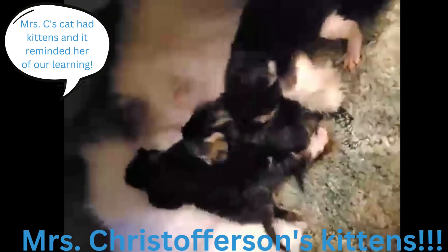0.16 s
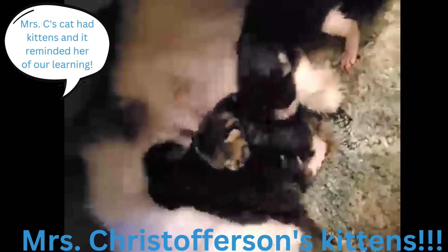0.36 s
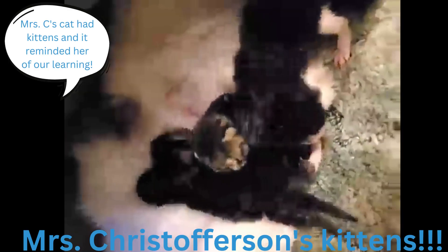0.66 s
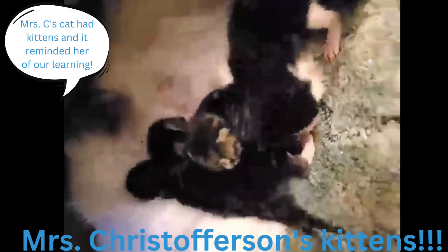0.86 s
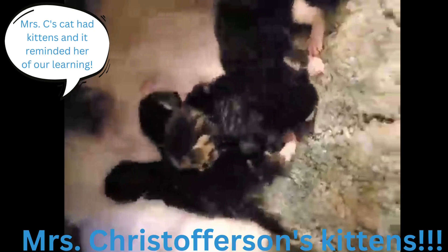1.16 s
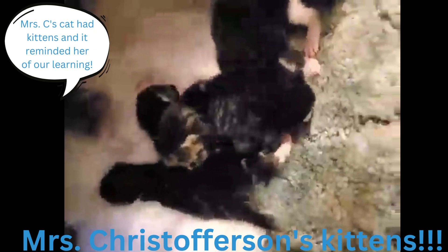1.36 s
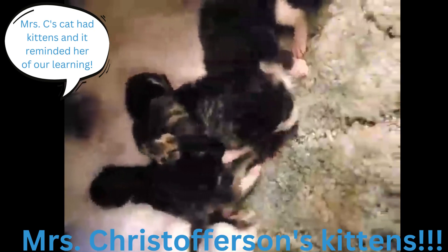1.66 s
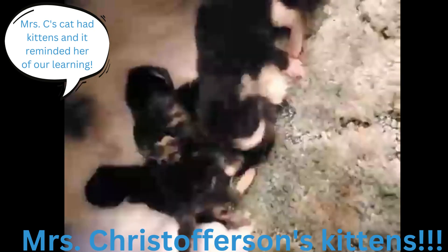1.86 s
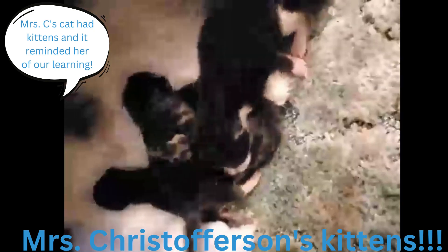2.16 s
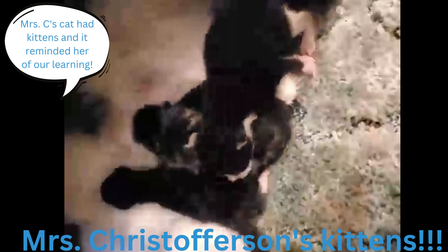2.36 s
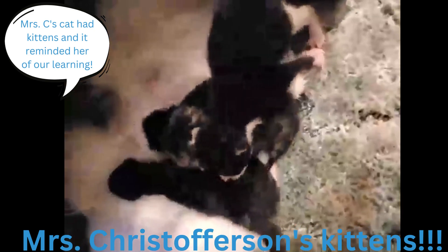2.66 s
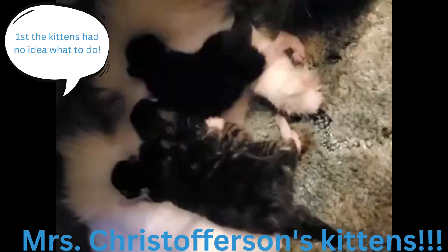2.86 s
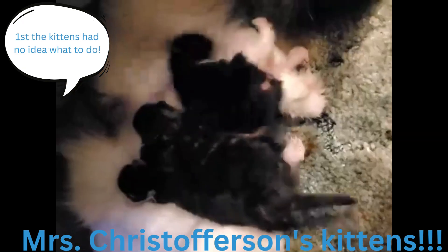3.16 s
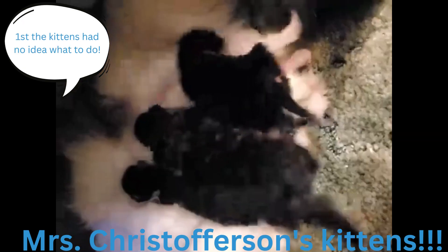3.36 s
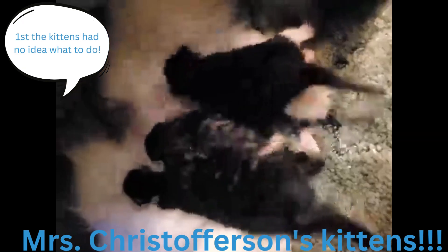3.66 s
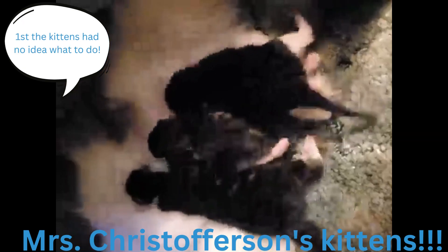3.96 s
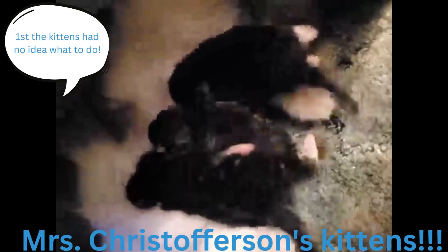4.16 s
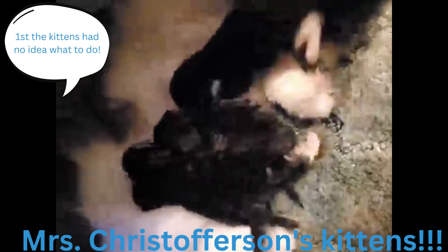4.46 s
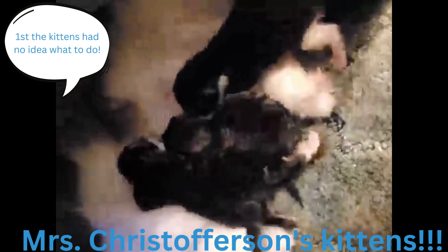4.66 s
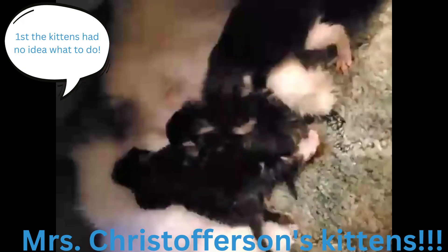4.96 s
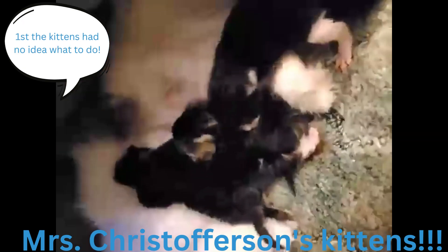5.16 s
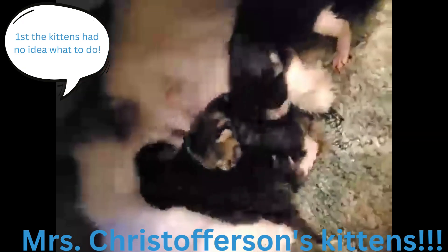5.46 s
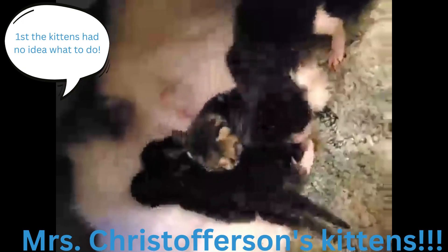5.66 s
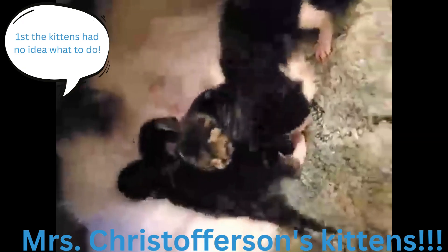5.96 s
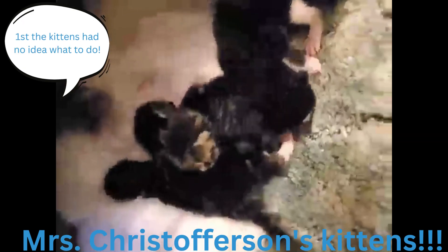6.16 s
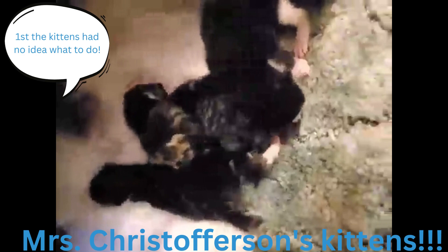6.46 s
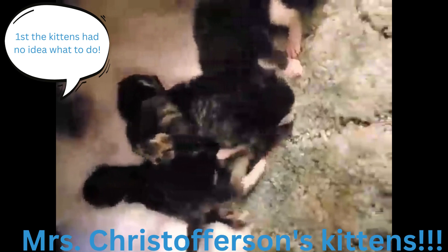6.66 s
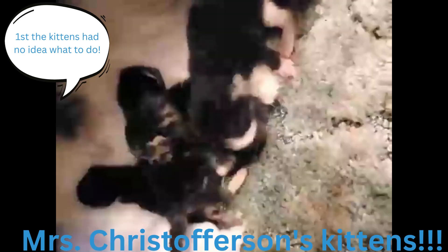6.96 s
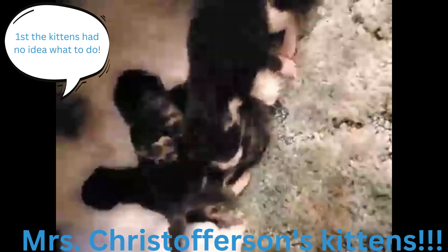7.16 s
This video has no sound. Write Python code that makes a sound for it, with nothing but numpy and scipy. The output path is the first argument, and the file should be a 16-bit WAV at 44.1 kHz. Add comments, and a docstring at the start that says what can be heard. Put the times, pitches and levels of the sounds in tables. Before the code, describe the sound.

A small cat close by gives five short, trilled mews while its ticking, uneven purr runs throughout, with tiny wet smacks in a quiet room.

```python
"""Mewing and purring on a rug

One cat, close by: five mews, trilled in varying degree by its own purr, which runs throughout.
Mew: harmonics of the vocal folds pass nose, throat and mouth resonances; an opening mouth brightens them.
Purr: the larynx snaps shut about 30 times a second; closures tick, reopenings puff, hiss and hum.
Wet smacks, a few stronger ticks, faint rustles, a soft room echo and quiet air with a low rumble lie around."""
import sys
import numpy as np
from scipy import signal
from scipy.fft import rfft, irfft
from scipy.io import wavfile
from scipy.ndimage import uniform_filter1d

SR = 44100
rng = np.random.default_rng(int(sys.argv[2]) if len(sys.argv) > 2 else 0)


def write(x):
    x = np.atleast_2d(x).T
    wavfile.write(sys.argv[1], SR, np.round(np.clip(x, -1, 1) * 32767).astype(np.int16))


N = 322371
T = np.arange(N) / SR  # t/s

# timbre of each mew, pairs from slack to tense folds, settings before opening and closing act: (mouth f/Hz,
# climb/(octaves/s), mouth width/Hz, nose level/dB slack, tense, upper level/dB slack, tense, top over upper level/dB,
# trill [0-1] slack, tense, roughness [0-1] slack, tense, upper f/Hz, top f/Hz, final rattle t/s,
# throat loss/dB at a wide open mouth)
MEW_TIMBRES = [(1680, 1.55, 660, -3.5, -1, -26.5, -6.5, -4.5, .28, 0.01, .3, 0.12, 3230, 5200, 0.093, 1),
               (2430, 0.82, 960, -4, -12.5, -16, -4, -9.5, .38, 0.04, .22, 0.03, 4030, 4940, .125, 10),
               (1900, 0.042, 1230, 4, -7, -20.5, -19.5, 12.5, .58, .45, 0.38, 0.17, 3630, 5820, 0.057, 2),
               (1240, 2.72, 980, 3, -1, -15, -18.5, -1.5, .5, .05, 0.24, 0.08, 3840, 5650, 0.094, 33),
               (1290, 1.74, 1260, 3, -11, -12, -6, -5, .56, 0.4, 0.56, 0.24, 4750, 5660, 0.19, 1)]
# path of each mew, before purr and resonances act: (t/s, pitch f/Hz, level/dB, mouth opening [0-1])
MEW_GESTURES = [
    [(.24, 412.3, -36.5, 0.21), (.31, 460.7, -43.5, 0.53), (.425, 511, -45, 0.52), (.45, 529, -39, 0.88),
     (.495, 545, -32, 0.78), (.54, 560, -35, 0.73), (.59, 577, -39.5, 0.53), (.7, 585, -39.5, 0.44),
     (.74, 547, -43, 0.7), (.785, 494, -44.5, 0.45), (.84, 459, -55, 0.2)],
    [(1.8, 410.3, -41.5, 0.04), (1.89, 410, -37, 0.4), (1.95, 462.4, -33.5, 0.5), (1.99, 523, -39.5, 0.4),
     (2.022, 545, -41, 0.91), (2.06, 559.6, -32, 0.59), (2.1, 560, -32, 0.63), (2.16, 564.6, -37.5, 0.69),
     (2.22, 559, -35.5, 0.61), (2.255, 541.7, -34.5, 0.34), (2.3, 522, -38.5, 0.55),
     (2.335, 447, -36, 0.36), (2.38, 450, -45, .4)],
    [(2.685, 518, -48, 0), (2.712, 481, -32.5, 0.35), (2.745, 478.7, -34, 0.6), (2.81, 521.2, -36, 0.58),
     (2.89, 529.5, -36.5, 0.46), (2.96, 485.7, -38.5, 0.4), (3.02, 415, -42, 0.36),
     (3.08, 401, -40.5, 0.16), (3.145, 353.4, -46, 0), (3.225, 440.6, -36.5, 0.09),
     (3.295, 409, -38.5, 0.19), (3.345, 430.4, -62, 0.35)],
    [(3.742, 467.4, -39.5, 0.54), (3.83, 439, -36, 0.49), (3.9, 429, -40, 0.45), (3.98, 458.5, -35.5, 0.41),
     (4.015, 526.3, -39.5, 0.75), (4.065, 561.4, -41.5, 0.81), (4.12, 561.8, -35.5, 0.63),
     (4.16, 551, -38, 0.61), (4.195, 521.6, -35, 0.35), (4.23, 460.4, -38, .42), (4.275, 444, -64, 0)],
    [(5.465, 423.5, -53.5, 0.47), (5.53, 424.6, -39, 0.14), (5.59, 391, -47, .12), (5.64, 415.4, -35, 0.05),
     (5.74, 440, -37, 0), (5.84, 466, -35.5, 0.27), (5.89, 468, -36.5, 0.66), (5.95, 524, -40.5, 0.72),
     (5.997, 531, -42.5, 0.62), (6.05, 534, -43.5, 0.38), (6.095, 498.4, -44, 0.24),
     (6.16, 500.5, -50, 0.35)],
]
# fixed colour of the voice: (f/Hz, level/dB)
VOICE_COLOUR = [(350, 0.5), (470, 0.4), (590, 1.9), (800, 5.5), (1300, -1.4), (1750, 2.6), (2200, 1.3),
                (2800, 6.9), (3350, 1.2), (3950, 4.1), (4500, -3.7), (5100, -1.3), (8000, -0.8),
                (12000, -13.9)]
# pace of the purring larynx, set anew at each row: (first closure t/s, closure rate f/Hz)
LARYNX_RHYTHM = [(.01, 27), (.855, 25.3), (1.327, 21.5), (1.81, 29), (2.686, 29.4), (3.112, 30.8),
                 (3.426, 28), (3.752, 34.6), (4.38, 35), (4.762, 28.5), (5.49, 31.2), (6.361, 29.6),
                 (6.8502, 26.35)]
# purring strokes, in and out; tick level before easing and fading:
# (start t/s, end t/s, tick level/dB, hum level/dB, hum f/Hz, hiss level/dB)
PURR_STROKES = [(-.05, 0.233, -38.5, -59.5, 287, -57), (0.246, 0.875, -37, -60, 376, -54.5),
                (0.842, 1.102, -49, -67, 252.5, -62.5), (1.079, 1.716, -34.5, -72.5, 243.7, -93),
                (1.789, 2.482, -35.5, -56.5, 370, -53), (2.686, 3.33, -29.5, -50, 345, -52),
                (3.408, 3.78, -39, -62, 263.5, -67), (3.735, 4.296, -31, -60.5, 380, -51),
                (4.334, 4.691, -37.5, -45.5, 297.7, -54), (4.749, 5.502, -36, -58, 271.4, -65),
                (5.474, 6.181, -26, -59, 355, -56), (6.143, 6.29, -38.5, -55, 297, -60),
                (6.324, 6.769, -47, -43, 363.4, -52), (6.841, 7.403, -24.5, -52, 357.5, -90)]
# spectra of the purr's hum, hiss, tick and thin indrawn air: (f/Hz, relative level/dB)
HUM_COLOUR = [(100, -15.5), (240, -4.5), (340, 1.5), (440, -0.5), (590, -36.5), (790, -7), (1020, -17.5),
              (1300, -23), (1800, -55), (3000, -28), (6000, -100)]
HISS_COLOUR = [(500, 15.5), (1300, 9), (1850, 2.5), (3000, 8.5), (3500, -1.5), (4200, 8), (5000, 0),
               (6000, 5.5), (7100, 6.5), (7900, -0.5), (9000, 2.5), (10300, -10), (12500, -6.5),
               (15500, -11)]
TICK_COLOUR = [(80, 7), (350, 11.5), (600, -7), (850, 5), (1300, 6), (1800, -15), (3200, -6.5), (4100, -3),
               (5100, -10), (7000, -5), (15000, -28.5)]
INDRAW_COLOUR = [(500, -9.5), (1300, 0.5), (2500, -17), (4200, -15), (5200, 8), (7200, 3.5), (10000, -8),
                 (12000, -0.5), (15500, -9.5)]
# wet smacks of lips and tongue, and a few stronger purr ticks: (t/s, starting level/dB, resonance f/Hz)
SMACKS_AND_TICKS = [(0.395, -28, 2040), (0.408, -30, 2160), (0.435, -22.5, 2400), (.436, -26, 5350),
                    (.781, -27, 2230), (0.809, -33, 2180), (.818, -36, 2060), (1.326, -44, 1240),
                    (1.877, -22.5, 1840), (2.709, -33, 2620), (2.754, -19.5, 2680), (3.98, -15, 1554),
                    (3.978, -23.5, 3120), (4.394, -32.5, 1193), (4.761, -35, 1170), (4.832, -41, 1150),
                    (5.798, -36.5, 4060)]
# faint squeaks, rustles and soft bumps around the cat: (centre t/s, half-length t/s, f/Hz, width/Hz, level/dB)
RUSTLES = [(0.618, 0.035, 85, 50, -49.5), (1.01, 0.0091, 11450, 700, -56.5),
           (1.048, 0.0073, 11600, 713, -54.5), (4.636, 0.031, 130, 129, -46.5),
           (5.172, 0.042, 3430, 1387, -57), (5.578, 0.0097, 3710, 406, -44),
           (5.608, 0.0086, 3900, 497, -42), (6.088, 0.027, 1547, 154, -33),
           (6.896, 0.014, 106.7, 80.4, -42.5)]
# spectra of the room's air and of its rumble: (f/Hz, relative level/dB)
ROOM_COLOUR = [(18, -64), (30, -14), (90, -3.5), (192, 7.5), (379, -8), (575, -1), (1140, -12.5),
               (1820, -12), (3070, -12.5), (5040, -19.5), (7080, -21), (10200, -22), (15500, -27.5)]
RUMBLE_COLOUR = [(30, -48), (60, -5.5), (85, 1.0), (200, -2.5), (320, -14), (900, -54)]

SLACK_HZ = 429  # below this pitch the folds are slack; they are fully tense at the top of each mew
SAG = .33  # share of the pitch between an open and a closed larynx, at full trill
ATTACK_S, RELEASE_S = 0.023, 0.031
TRILL_YIELDS = 0.745  # tension at which the voice has pushed the purr back as far as it will
# over the last CLOSING_S the jaw shuts and lowers the resonances; at the very end the voice breaks into a rattle
CLOSING_S, CLOSING_OCTAVES, CLOSING_TAKES_S = 0.11, 0.27, 0.037
FRY_TAKES_S, FRY_ROUGH, FRY_TRILL, FRY_BRIGHT_DB = 0.054, 0.8, 0.538, 3


def undb(db):
    """Level law: decibels to amplitude gain."""
    return 10 ** (np.asarray(db) / 20)


def unit(x):
    """Normalization: scale to rms 1."""
    return x / np.sqrt(np.mean(x ** 2))


def blend(a, b, share):
    """Linear interpolation: from a at share 0 to b at share 1."""
    return a + (b - a) * share


def curves(rows, t=T):
    """Piecewise linear motion: the columns of a table joined by straight lines in time."""
    s, *columns = np.transpose(rows)
    return [np.interp(t, s, c) for c in columns]


def inside(start, end, rise, fall):
    """Trapezoidal gating: 1 from start to end, with sloping edges."""
    return np.clip(np.minimum((T - start) / rise, (end - T) / fall), 0, 1)


def colour(points, hz):
    """Spectral envelope: gain interpolated in dB over log frequency."""
    f, db = np.transpose(points)
    return undb(np.interp(np.log(hz + 1), np.log(f), db))


def resonance(hz, centre_hz, width_hz, steep):
    """Resonance: gain and phase by distance from the centre, where they are 1 and 0."""
    off = np.float32((hz / centre_hz - centre_hz / hz) * centre_hz / width_hz)
    return (1 + off * off) ** (-steep / 2), -steep * np.arctan(off)


def noise(points):
    """Spectral shaping: white noise filtered to a given spectrum, rms 1."""
    spectrum = rfft(rng.standard_normal(N)) * colour(points, np.fft.rfftfreq(N, 1 / SR))
    return unit(irfft(spectrum, N))


def walk(rate, size=N):
    """Band-limited chance: smooth variation about rate times a second, rms 1."""
    hold = max(2, int(SR / rate))
    steps = np.repeat(rng.standard_normal(size // hold + 1), hold)
    return unit(uniform_filter1d(steps, hold)[:size])


def impulse_response(points, size=1024):
    """Minimum phase: the most compact causal ring with a given spectrum, peak 1."""
    cepstrum = irfft(np.log(colour(points, np.fft.rfftfreq(size, 1 / SR))))
    # fold the cepstrum onto positive time
    cepstrum[1:size // 2] *= 2
    cepstrum[size // 2 + 1:] = 0
    ring = irfft(np.exp(rfft(cepstrum)))
    return ring / np.abs(ring).max()


def larynx():
    """Relaxation cycle: place in the purr cycle, 0 at each closure, with a slightly uneven beat."""
    start, rate = np.transpose(LARYNX_RHYTHM)
    row = np.maximum(np.searchsorted(start, T, side="right") - 1, 0)
    cycles = (T - start[row]) * rate[row]
    return (cycles + .015 * walk(20) * np.minimum(cycles, 1)) % 1


def closure_shape(cycle):
    """Asymmetric closure: the folds are caught quickly and recover more slowly."""
    return np.cos(np.pi * cycle ** 1.2) ** 4


def mew(gesture, timbre, cycle, choke=0.92, jitter=0.0376, rasp_hz=2200, nose_hz=420, throat_hz=1000,
        lead=.1, mouth_lag_s=0.022, treble_open_db=26, treble_full=0.9, top_slack_db=-7, shut_trill=1.2,
        wide_from=.68, shut_db=-25, open_db=20, opening_octaves=0.95, dull_hz=8500, muffle_hz=2200, count=26):
    """Source and filter: fold harmonics through resonances; purr closures drag pitch and level down."""
    start, end = gesture[0][0], gesture[-1][0]
    gate = inside(start, end, ATTACK_S, RELEASE_S)
    on = gate > 0
    t, size = T[on], on.sum()
    pitch, level_db, opening = curves(gesture, t)
    first_hz, climb, mouth_width_hz, nose_slack, nose_tense, upper_slack, upper_tense, top_db = timbre[:8]
    trill_slack, trill_tense, rough_slack, rough_tense = timbre[8:12]
    upper_hz, top_hz, fry_s, throat_loss_db = timbre[12:]
    jaw = 2 ** (-CLOSING_OCTAVES * np.clip((t - end + CLOSING_S) / CLOSING_TAKES_S, 0, 1))
    fry = np.clip((t - end + fry_s) / FRY_TAKES_S, 0, 1)

    # an opening mouth rings louder and, a moment later, higher
    mouth_db = blend(shut_db, open_db, opening)
    lagged_opening = np.interp(t - mouth_lag_s, t, opening)
    mouth_hz = first_hz * jaw * 2 ** (opening_octaves * (lagged_opening - 1) + climb * (t - start))
    throat_db = -throat_loss_db * np.clip((opening - wide_from) / (1 - wide_from), 0, 1)

    # tension moves the nose and upper levels from their slack to their tense settings
    tension = np.clip((pitch - SLACK_HZ) / (pitch.max() - SLACK_HZ), 0, 1)
    nose_db = blend(nose_slack, nose_tense, tension)
    upper_db = blend(upper_slack, upper_tense, tension ** 2.45)
    upper_db = upper_db + FRY_BRIGHT_DB * fry * (1 - tension)
    # a shut mouth holds back the treble and lets the purr cut deeper
    upper_db = upper_db + treble_open_db * (np.minimum(opening, treble_full) - .5)
    top_db = top_db + top_slack_db * (1 - tension)
    trill_slack = trill_slack * (1 + shut_trill * (.5 - opening))
    # tense folds shake off the purr
    clear = np.minimum(tension / TRILL_YIELDS, 1)
    trill = np.clip(np.maximum(blend(trill_slack, trill_tense, clear), FRY_TRILL * fry), 0, 1)
    rough = blend(blend(rough_slack, rough_tense, clear), FRY_ROUGH, fry)

    closed = closure_shape(cycle[on])
    pitch = pitch * (1 - SAG * trill * (closed - .3) + jitter * rough * walk(350, size))
    muffled = closure_shape((cycle[on] + lead) % 1)
    flow = (1 - choke * trill ** 2.06 * closed) / (1 - 0.13 * trill ** 2)
    phase, out = 2 * np.pi * np.cumsum(pitch) / SR, np.zeros(N)
    weights = undb(level_db + np.array([nose_db, throat_db, mouth_db, upper_db, upper_db + top_db]))
    for k in range(1, count + 1):
        hz = k * pitch
        gains, delays = zip(resonance(hz, nose_hz, 233, 1.58),
                            resonance(hz, throat_hz, 340, 2.3),
                            resonance(hz, mouth_hz, mouth_width_hz, 2.5),
                            resonance(hz, upper_hz * jaw, 1050, 2.03),
                            resonance(hz, top_hz * jaw, 1100, 1.57))
        gain = np.linalg.norm(weights * np.array(gains), axis=0)
        gain *= colour(VOICE_COLOUR, hz) / np.hypot(1, (hz / dull_hz) ** 2)
        # a closing larynx muffles the high harmonics first
        gain *= np.exp(-trill * (muffled - .2) * np.minimum(hz / muffle_hz, 2))
        # every resonance shifts the phase of the harmonics that pass through it
        turn = k * phase + sum(delays)
        # uneven fold cycles smear the harmonics, the high ones most
        smear = rough * (hz / rasp_hz) ** 1.16
        partial = (1 + smear * walk(450, size)) * np.cos(turn)
        partial += smear * walk(450, size) * np.sin(turn)
        out[on] += gain * flow * partial * np.sqrt(2 / (1 + 2 * smear ** 2))
    return out * gate


def purr(cycle, hiss_leak=0.6, hum_leak=0.51, puff_at=0.34, puff_width=0.097, voiced=0.68,
         fading_db_per_s=22, soft_db=8, soft_s=0.067, indraw_db=-35, indraw_at=0.13, indraw_width=0.6,
         spray=0.1, spray_s=0.0028):
    """Pulsed flow: closures tick and draw in a wisp of air; reopenings puff, hiss and hum."""
    puff = np.exp(-((cycle - puff_at) / puff_width) ** 2)
    air = noise(HISS_COLOUR) * unit(puff + hiss_leak) * undb(0.26 * walk(54))
    throat = noise(HUM_COLOUR)
    waver = 1 + 0.1042 * walk(250)  # unsteady pitch of the slack folds
    throb = unit(puff + hum_leak)
    closure = np.diff(cycle, prepend=0) < -.05
    indraw = noise(INDRAW_COLOUR) * np.exp(-((cycle - indraw_at) / indraw_width) ** 2)
    out, snaps = np.zeros(N), np.zeros(N)
    for start, end, tick_db, hum_db, hum_hz, hiss_db in PURR_STROKES:
        on = (T > start) & (T < end)
        folds = np.sin(2 * np.pi * np.cumsum(hum_hz * waver[on]) / SR)
        hum = unit(throat[on] + 2 * voiced * folds) * throb[on]
        breath = undb(hum_db) * hum + undb(hiss_db) * air[on] + undb(tick_db + indraw_db) * indraw[on]
        out[on] += inside(start, end, 0.065, 0.025)[on] * breath
        # the closures harden just after a stroke begins, then fade
        since = T[on] - start
        snap_db = tick_db - soft_db * np.exp(-since / soft_s) - fading_db_per_s * since
        snaps[on] -= closure[on] * undb(snap_db + 2 * rng.standard_normal(on.sum()))
    # each snap is followed by a moist crackle
    decay = signal.lfilter([spray], [1, -np.exp(-1 / (spray_s * SR))], snaps)
    crackle = decay * rng.standard_normal(N)
    return out + signal.fftconvolve(snaps + crackle, impulse_response(TICK_COLOUR))[:N]


def smacks_and_ticks(ring_s=0.0016, spray=0.13, size=600):
    """Damped oscillation: a smack or strong tick is a very short ring with a little spray."""
    out, t = np.zeros(N), np.arange(size) / SR
    for s, db, hz in SMACKS_AND_TICKS:
        i = int(s * SR)
        ring = np.sin(2 * np.pi * hz * t) + spray * rng.standard_normal(size)
        out[i:i + size] += undb(db) * np.exp(-t / ring_s) * ring
    return out


def rustles():
    """Quadrature modulation: slow noise on two carriers makes short swells of narrow noise."""
    out = np.zeros(N)
    for s, half_length, hz, width_hz, db in RUSTLES:
        on = np.abs(T - s) < half_length
        turn = 2 * np.pi * hz * T[on]
        band = walk(width_hz, on.sum()) * np.cos(turn) + walk(width_hz, on.sum()) * np.sin(turn)
        out[on] += undb(db) * band * np.cos(np.pi / 2 * (T[on] - s) / half_length) ** 2
    return out


def room_echo(x, wet_db=-22, t60=0.35, size=16000):
    """Reverberation: the small carpeted room answers with softened, exponentially decaying noise."""
    t = np.arange(size) / SR
    tail = uniform_filter1d(rng.standard_normal(size), 4) * undb(-60 * t / t60) * (t > .004)
    return undb(wet_db) * signal.fftconvolve(x, tail / np.linalg.norm(tail))[:N]


def room_tone(air_db=-62, rumble_db=-63, swell_db=4):
    """Stationary and modulated noise: quiet indoor air with an unsteady low rumble."""
    rumble = noise(RUMBLE_COLOUR)
    return undb(air_db) * noise(ROOM_COLOUR) + undb(rumble_db + swell_db * walk(22)) * rumble


def scene():
    """Superposition: mews and purr share one larynx rhythm; the room is added to them."""
    cycle = larynx()
    mews = sum(mew(gesture, timbre, cycle) for gesture, timbre in zip(MEW_GESTURES, MEW_TIMBRES))
    near = mews + purr(cycle) + smacks_and_ticks() + rustles()
    return (near + room_echo(near) + room_tone())[None]


def record(dry):
    """Band limiting: the microphone drops the deepest bass and the very top."""
    thin = signal.sosfilt(signal.butter(4, 46, "high", fs=SR, output="sos"), dry)
    return signal.sosfilt(signal.ellip(10, .2, 70, 15800, fs=SR, output="sos"), thin)


dry = scene()
out = record(dry)
write(out)
```